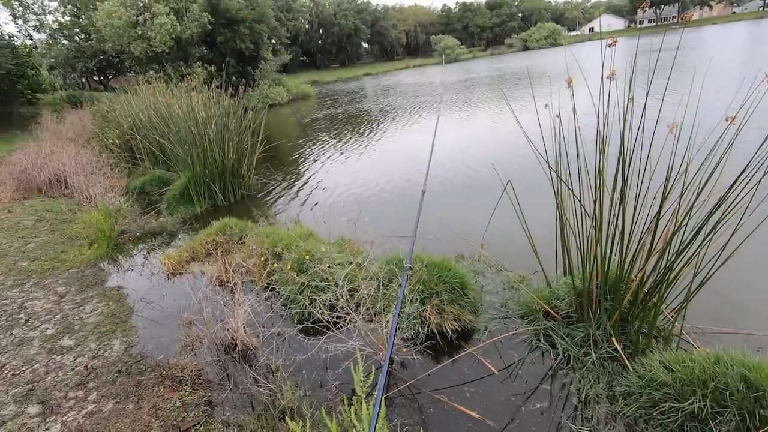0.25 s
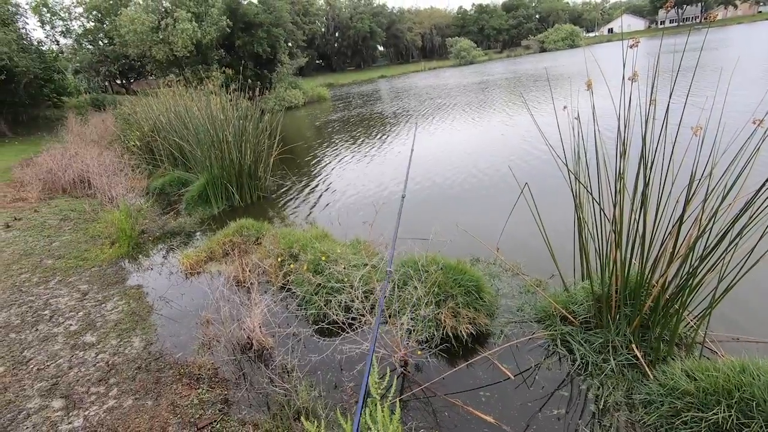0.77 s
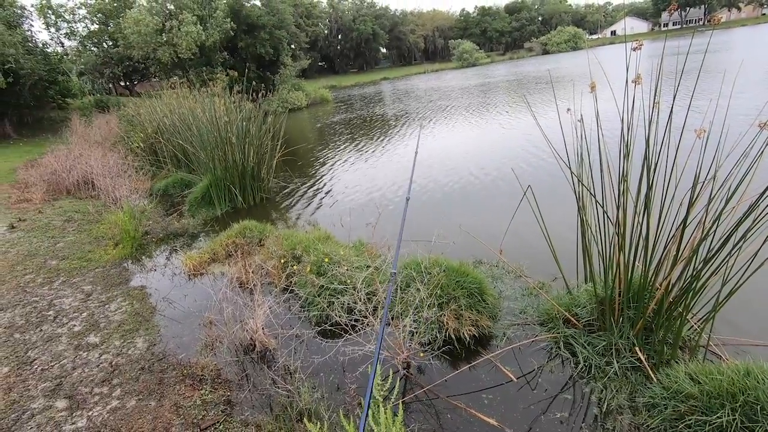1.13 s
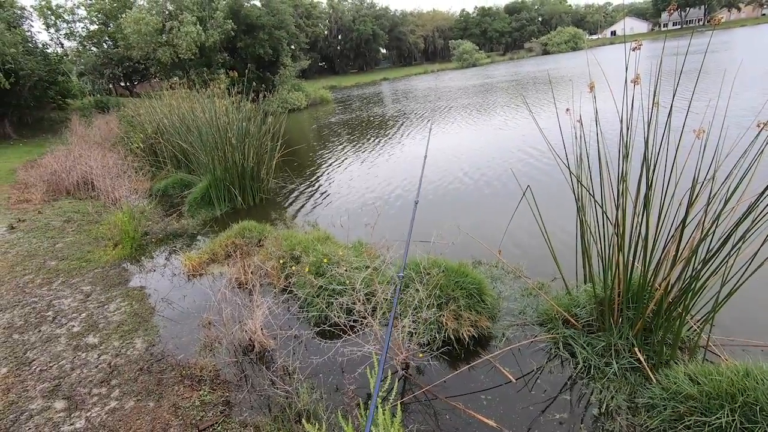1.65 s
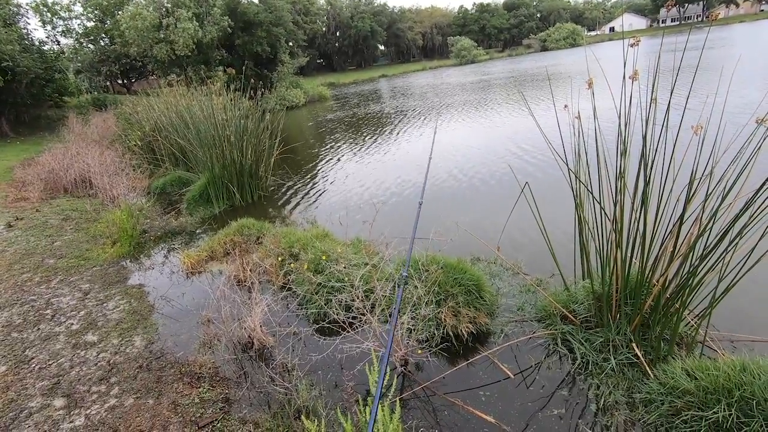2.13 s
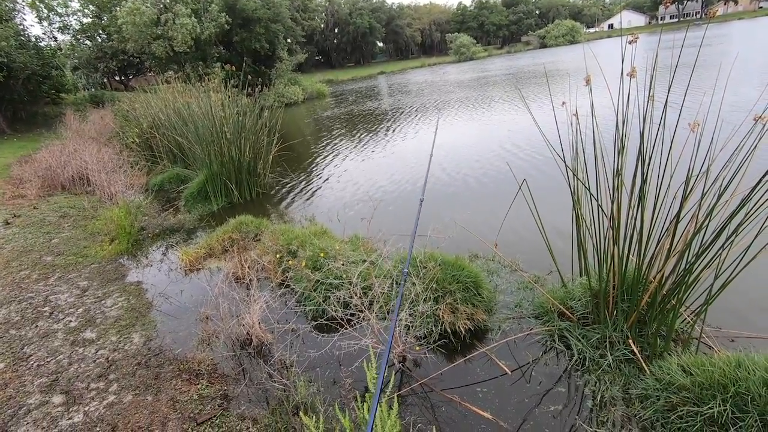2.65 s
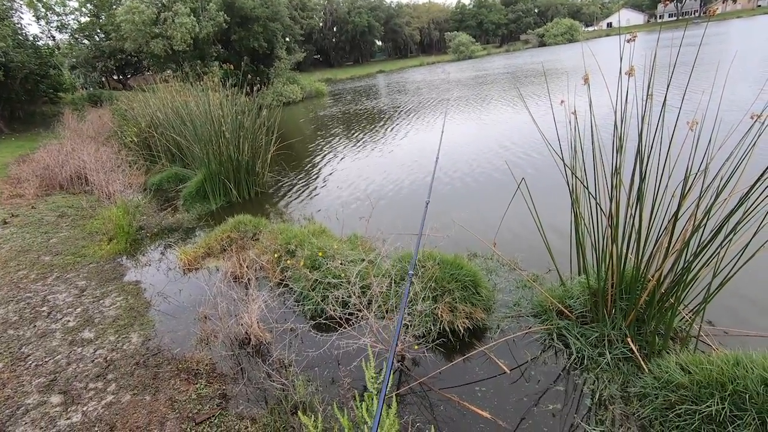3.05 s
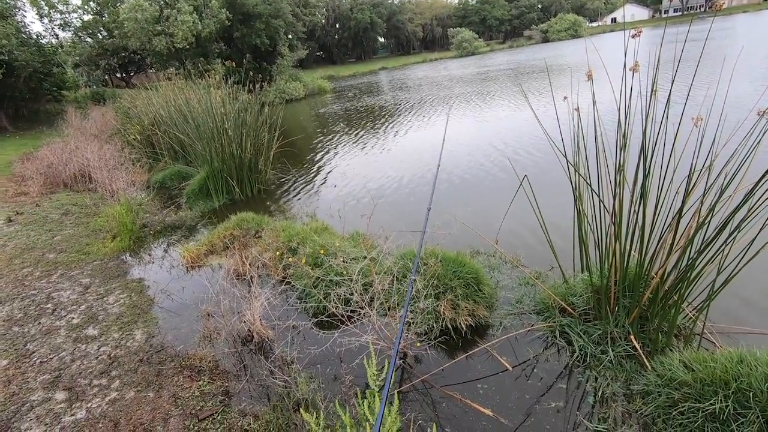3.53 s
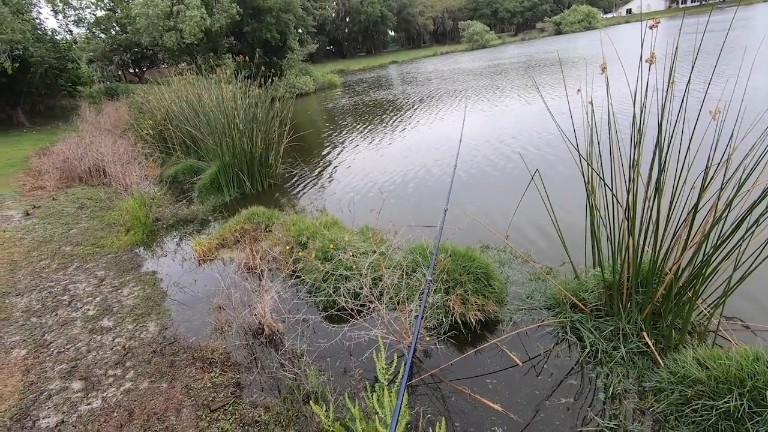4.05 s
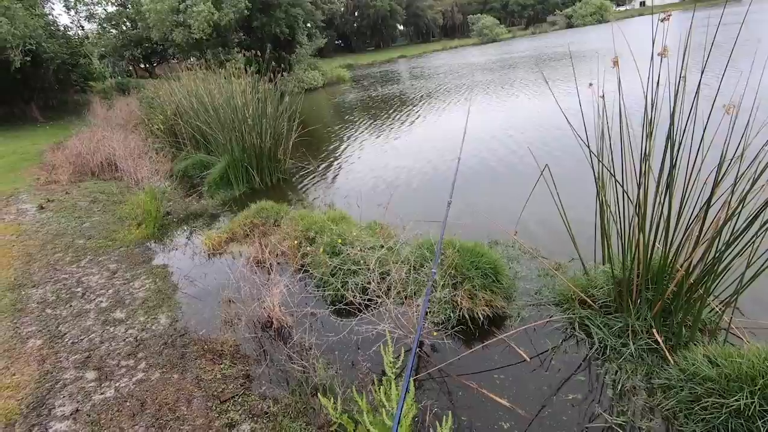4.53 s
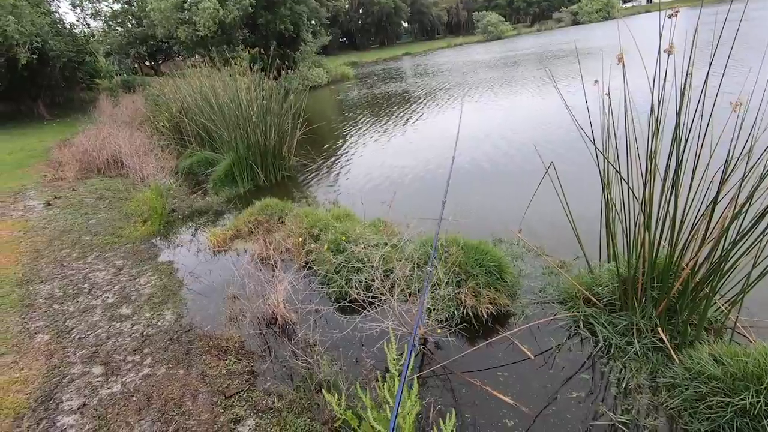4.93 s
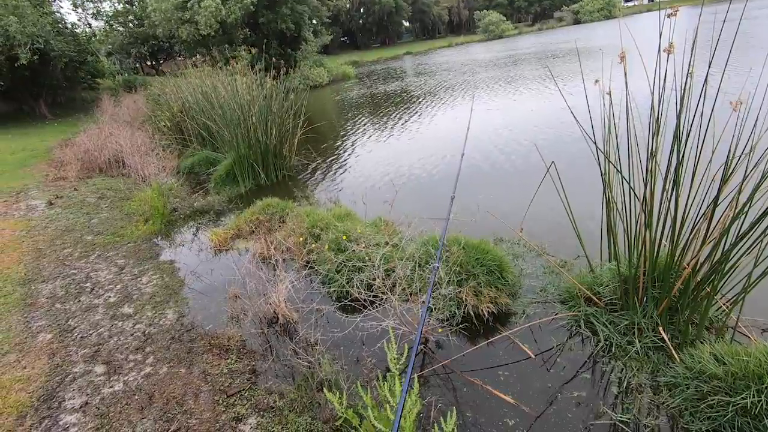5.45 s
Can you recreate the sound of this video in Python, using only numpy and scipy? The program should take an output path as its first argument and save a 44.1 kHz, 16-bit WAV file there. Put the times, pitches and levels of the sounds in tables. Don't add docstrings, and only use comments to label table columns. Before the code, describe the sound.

Outdoors by a pond, a low engine drone with road hiss is strongest at the start and fades after about two seconds. Crickets pulse steadily throughout. A songbird gives short falling whistles and small birds twitter, mostly in the first three seconds. Around three to four and a half seconds, wind thumps low on the stereo microphone, stronger on the left.

```python
import sys
import numpy as np
from scipy import signal
from scipy.fft import rfft, irfft
from scipy.io import wavfile
from scipy.ndimage import uniform_filter1d

SR = 44100
rng = np.random.default_rng(int(sys.argv[2]) if len(sys.argv) > 2 else 0)


def put_to_file(sound):
    columns = np.atleast_2d(sound).T
    safe = np.clip(columns, -1, 1)
    whole_steps = np.round(safe * 32767)
    wavfile.write(sys.argv[1], SR, whole_steps.astype(np.int16))


def to_linear_factor(level_db):
    exponent = np.asarray(level_db, float) / 20
    return 10 ** exponent


N = 250488
TIME = np.arange(N) / SR
HZ = np.fft.rfftfreq(N, 1 / SR) + 1e-3

# t/s, remoteness [0-1]
REMOTENESS = [
    (0, 0.18),
    (.4, 0),
    (1.63, 0.14),
    (2.3, 0.12),
    (3.1, 0.73),
    (4.5, 0.97),
    (5.68, 0.8),
]
# t/s, f/Hz
FIRING_RATE = [(0, 31.04), (2.0, 31.57), (4.0, 31.77), (5.68, 32.21)]
# multiple of the firing rate, level/dB, remoteness [0-1] where shade sets in
HARMONICS = [(2, 1.5, 1.5), (3, -5, 1.5), (4, -5, 1.5), (5, -12.5, 1.5), (6, -4, 0.2), (7, 0.5, 0.13),
             (8, -0.5, 0.65), (9, -11.5, 1.5), (10, -9, 0.18), (11, -11, .12)]
# f/Hz, level/dB per Hz
RUMBLE_SPECTRUM = [(8.2, -59), (14, -13), (54, -3), (70, -0.5), (86, -7), (113, -4.5), (145, -9),
                   (215, -1.5), (259, -4), (332, -11.5), (450, -9), (580, -46), (990, -120)]
HISS_SPECTRUM = [(180, -31), (300, -3), (464, -7.5), (528, -7), (601, -7.5), (907, -6), (1370, -11),
                 (2250, -21.5), (3430, -25), (4340, -30.5), (5000, -37.5), (6500, -64), (11000, -120)]
AIR_SPECTRUM = [(3500, -4), (4600, -4.5), (5600, -1), (6700, -9), (8300, -10.5), (9600, -9.5),
                (10400, -18.5), (11000, -26.5), (11800, -32.5), (12300, -59), (20000, -81.5)]
# f/Hz, left minus right level/dB
PORT_TILT = [(60, 2.5), (89, -2), (130, -1), (200, 0.0), (290, -1), (440, -1.5), (650, -4.5), (970, -11),
             (1440, -9), (2150, -3), (3190, -2), (4750, 1), (7070, 0.5), (10500, 5)]
# f/Hz, likeness [0-1]
PORT_COHERENCE = [(30, 1), (250, 0.93), (500, 0.97), (700, 0.99), (950, 0.23), (1150, 0.67), (2000, 0.44),
                  (4200, 0.72), (4900, 0.33), (6300, 0.18), (8000, 0.31), (9200, .12), (10500, .3)]
# f/Hz, lead of the right port [rad]
PORT_LEAD = [(40, 0.14), (140, -0.6), (400, 0.46), (800, 0.83), (1020, -.5), (1700, -0.6), (2500, 0.87),
             (3500, -0.5), (4500, -0.5), (5400, -1.13), (6200, -3), (7000, -4.5), (7900, -3), (10500, -4.5)]
# t/s, pressure level/dB, sharpness of the eddies [0-1]
GUST_PRESSURE = [(0, -70, 0.6), (2.6, -57, 0.3), (2.71, -42, 0.5), (2.87, -38, 0), (3.03, -35.5, 0.56),
                 (3.13, -40, 0.6), (3.2, -38.5, 0), (3.29, -40.5, 0.76), (3.42, -30, .6), (3.53, -32, .5),
                 (3.6, -38, .4), (3.8, -30, .15), (3.92, -33, .95), (4.08, -33, 1.0), (4.18, -43, .6),
                 (4.38, -37, 0.45), (4.65, -52.5, 0.2), (5.68, -59, .6)]
CHIRP_BEATS = [17, 17, 16, 16, 16, 16, 16, 15, 17, 15, 16, 17, 16, 17, 16, 17, 16, 16, 17, 16, 17, 16, 16,
               18, 16, 16]
# start t/s, length t/s, from f/Hz, to f/Hz, peak level/dB
SLIDE_NOTES = [(.18, .06, 4020, 3040, -61), (.32, .08, 4080, 3100, -64), (.793, .088, 4740, 3330, -64.5),
               (.785, .055, 3950, 3250, -67), (1.35, .1, 3760, 2800, -68), (1.98, .09, 3050, 2800, -63),
               (2.285, .045, 3030, 2880, -65), (2.43, .06, 3470, 3000, -68), (2.625, .072, 2830, 3330, -61)]
HOOK_NOTES = [
    (1.86, .1, 3790, 2920, -60),
    (2.19, .098, 3760, 3020, -59),
]
DROOP_NOTES = [
    (.872, .14, 3350, 2230, -62),
]
FLICK_NOTES = [
    (2.688, .052, 3290, 3440, -58),
    (2.94, .112, 3100, 3520, -59.5),
]
CREEP_NOTES = [
    (2.12, .097, 6500, 6850, -70),
    (3.42, .26, 6350, 6830, -77),
]
NEAR_NOTES = [
    (2.325, .065, 3840, 2880, -52),
]
HIGH_NOTES = [
    (.375, .16, 6880, 7000, -69),
    (.545, .075, 7000, 6920, -75),
    (3.36, .11, 6700, 6860, -79),
    (3.765, .228, 6200, 6920, -62),
    (4.0, .035, 6800, 6780, -75),
]
# bend of glide, scoop f/Hz, place of peak [0-1], start level/dB and end level/dB
# relative to the peak, left minus right level/dB
SLIDE_MANNER = (-.3, 0, .5, -2.5, -2, -.6)
HOOK_MANNER = (1.2, 200, .7, -8, -4, -.6)
DROOP_MANNER = (.8, 0, .75, -2.5, -2, 0)
FLICK_MANNER = (2.4, 0, .3, -2, -6, -1.5)
CREEP_MANNER = (-1.2, 0, .75, -3, -4, -.5)
NEAR_MANNER = (.9, 400, .55, -7, -5, -16)
HIGH_MANNER = (-8, 0, .2, -1.5, -7, -3)
# t/s, peak level/dB, top
# f/Hz
TWITTER_ARCHES = [(.186, -65, 7800), (.212, -60, 6850), (2.6004, -60, 7030), (2.6574, -56, 7360),
                  (2.6724, -66, 7460), (2.6968, -58, 7240), (2.711, -50, 7100), (2.7364, -58, 7410),
                  (2.7706, -54.5, 7300), (2.8095, -61, 7100), (2.8224, -55, 7000), (5.0413, -63, 7610),
                  (5.1008, -66, 7420)]
# t/s, number of notes, spacing t/s, peak level/dB, top f/Hz
TWITTER_TRILLS = [(.3965, 4, .034, -66, 7440), (.41, 4, .038, -68, 6800), (1.1912, 3, .042, -69, 6990),
                  (1.4974, 6, .021, -68, 7280), (2.2154, 4, .031, -66, 7150), (2.2273, 4, .032, -62, 6840),
                  (2.345, 2, .04, -63, 6700), (3.0535, 4, .034, -66, 7090), (3.076, 5, .037, -68, 7480),
                  (3.6354, 7, .0202, -66, 7230), (4.2223, 4, .0203, -66, 7790), (4.2414, 2, .02, -62, 7780),
                  (4.225, 3, .025, -71, 6850)]
# t/s, peak level/dB, left minus right level/dB, top f/Hz
SNAPS = [
    (0.7223, -59, 12, 13500),
    (3.8053, -55.5, 2, 12500),
    (4.0971, -66, 5.5, 10500),
]


def rms_one(x):
    return x / np.sqrt(np.mean(x ** 2) + 1e-20)


def in_time(rows, t=TIME):
    s, *columns = np.transpose(rows)
    return [np.interp(t, s, c) for c in columns]


def at_hz(points):
    hz, value = np.transpose(points)
    return np.interp(np.log(HZ), np.log(hz), value)


def drift(rate_hz, size=N):
    r = np.exp(-80 * np.pi * rate_hz / SR)
    noise = rng.standard_normal(size // 40 + 2002)
    slow = rms_one(signal.lfilter([1], [1, -2 * r, r * r], noise)[500:])
    return np.interp(np.arange(size) / 40, np.arange(len(slow)), slow)


def pan(x, left_db):
    return x * np.array([to_linear_factor(left_db / 2), to_linear_factor(-left_db / 2)]).reshape(2, -1)


def slope(hz, order):
    return 1 / (1 + (HZ / hz) ** order)


def lagged(stereo):
    right = irfft(rfft(stereo[1]) * np.exp(1j * at_hz(PORT_LEAD)), N)
    return np.array([stereo[0], right])


def resonant_noise(hz, half_width_hz):
    noise = rfft(rng.standard_normal(N))
    return rms_one(irfft(noise / (1 + ((HZ - hz) / half_width_hz) ** 2), N))


def engine():
    shade_db, shade_width = 14, 0.071
    remoteness, = in_time(REMOTENESS)
    turns = np.cumsum(in_time(FIRING_RATE)[0]) / SR
    out = 0
    for k, near_db, shaded_at in HARMONICS:
        shade = (1 + np.tanh((remoteness - shaded_at) / shade_width)) / 2
        level_db = near_db - shade_db * shade + 1.97 * drift(1.3)
        phase = 2 * np.pi * k * turns + 0.3 * drift(1.0) + rng.uniform(0, 2 * np.pi)
        out = out + to_linear_factor(level_db) * np.sin(phase + [[0], [.25]])
    return to_linear_factor(-40 - 3.0) * out


def wind():
    windward_db = 5.2
    thud_db, sharp = in_time(GUST_PRESSURE)
    flutter_db = thud_db + 1.5 - 10 * (1 - sharp)
    rush_db = thud_db - 7.5 - 24 * (1 - sharp)
    # level/dB, lower f/Hz, upper f/Hz, share of the windward difference
    bands = ((thud_db, 17, 48, 1.05), (flutter_db, 50, 105, .6), (rush_db, 100, 190, .5))
    out = 0
    for level_db, low_hz, high_hz, lean in bands:
        shape = np.sqrt(slope(high_hz, order=7) * (1 - slope(low_hz, order=5)))
        eddies = rms_one(irfft(rfft(rng.standard_normal((2, N))) * shape, N))
        lumps = to_linear_factor([1.5 * drift(12), 2.2 * drift(6.1)])
        out = out + pan(to_linear_factor(level_db + 1.2), lean * windward_db) * eddies * lumps
    return out


def strokes(times, hz, fall_hz, rise_s, drop_s, level_db, uneven_db, loose):
    out, t = np.zeros(N + 2000), np.arange(-400, 400) / SR
    shape = np.exp(-.5 * (t / np.where(t < 0, rise_s, drop_s)) ** 2)
    for s, (loud, tune, phase) in zip(times, rng.standard_normal((len(times), 3))):
        cycles = (hz + 12 * tune) * t - fall_hz * t ** 2 / 2
        tone = np.sin(2 * np.pi * cycles + loose * phase)
        i = round(s * SR) + 600
        if 0 <= i < N + 1000:
            out[i:i + 800] += to_linear_factor(level_db + uneven_db * loud) * shape * tone
    return out[1000:N + 1000]


def crickets():
    strokes_per_s, first_stroke_s, rest_beats = 72, -.024, 6
    groups = []
    for end, cycle in zip(np.cumsum(CHIRP_BEATS), CHIRP_BEATS):
        groups.append(end - cycle + np.arange(cycle - rest_beats))
    times = first_stroke_s + np.concatenate(groups) / strokes_per_s
    near = strokes(times, 5420, 19000, .0030, .0026, -59.8, 1.1, 1.3) * to_linear_factor(.6 * drift(1.5))
    second_mode = strokes(times + .003, 5050, 9000, .003, .003, -70.5, 2.5, 2.5)
    far = strokes(np.arange(0, 5.68, 1 / 40.5), 5900, 15000, .004, .003, -69.5, 2.5, 3.)
    return lagged(pan(near + second_mode, 1.8) + pan(far, -.6))


def sung(note, manner):
    s, length_s, from_hz, to_hz, peak_db = note
    bend, scoop_hz, peak_at, start_db, end_db, _ = manner
    u = np.linspace(0, 1, 32)
    glide = np.expm1(bend * u) / np.expm1(bend)
    hz = from_hz * (to_hz / from_hz) ** glide - scoop_hz * np.exp(-u * length_s / .006)
    level_db = peak_db + np.interp(u, [0, peak_at, 1], [start_db, 0, end_db])
    return np.transpose([s + length_s * u, hz, level_db])


def whistle(rows, second_db, third_db, shake_db):
    t = TIME[round(rows[0][0] * SR):round(rows[-1][0] * SR)]
    hz, level_db = uniform_filter1d(in_time(rows, t), size=300, mode="nearest")
    phase = 2 * np.pi * np.cumsum(hz + 30 * drift(60, size=len(t))) / SR
    tone = np.sin(phase) + to_linear_factor(second_db) * np.sin(2 * phase)
    tone = tone + to_linear_factor(third_db) * (np.sin(3 * phase) + .12 * np.sin(4 * phase))
    ends = np.clip(np.minimum(t - t[0], t[-1] - t) / 0.007, 0, 1)
    return np.sqrt(2) * to_linear_factor(level_db + shake_db * drift(43, size=len(t))) * ends * tone


def songbird():
    kinds = ((SLIDE_NOTES, SLIDE_MANNER), (HOOK_NOTES, HOOK_MANNER), (DROOP_NOTES, DROOP_MANNER),
             (FLICK_NOTES, FLICK_MANNER), (CREEP_NOTES, CREEP_MANNER), (NEAR_NOTES, NEAR_MANNER),
             (HIGH_NOTES, HIGH_MANNER))
    out = np.zeros((2, N))
    for notes, manner in kinds:
        left_db = manner[-1]
        colour_db = (-20, -29, 2.0) if left_db < -8 else (-60, -70, 1.7)
        for note in notes:
            rows = sung(note, manner)
            tone = whistle(rows, *colour_db)
            i = round(rows[0][0] * SR)
            out[:, i:i + len(tone)] += pan(tone, left_db)
    return out


def trilled():
    rows = []
    for s, count, gap_s, db, hz in TWITTER_TRILLS:
        rows += [(s + k * gap_s, db, hz) for k in range(count)]
    rows = np.array(rows)
    return list(rows + rng.standard_normal(rows.shape) * [.002, 1.5, 90])


def twitter():
    out, t = np.zeros((2, N)), np.linspace(-1, 1, 700)
    for s, peak_db, top_hz in list(TWITTER_ARCHES) + trilled():
        hz = top_hz + 80 - np.where(t < .1, 480, 1500) * np.abs(t - .1) ** 2.5
        tone = np.sin(2 * np.pi * np.cumsum(hz) / SR)
        arch = to_linear_factor(peak_db - 3.0) * np.clip(1 - t ** 2, 0, 1) * tone
        i = round(s * SR)
        out[:, i:i + len(t)] += pan(arch, -.8)
    return out


def echoes(x, t60, level_db):
    tail = np.arange(16000) / SR
    shared, own = rng.standard_normal((2, len(tail))) * to_linear_factor(-60 * tail / t60) * (tail > .006)
    returns = (shared + .5 * own * [[1], [-1]]) / np.linalg.norm(shared)
    return to_linear_factor(level_db) * signal.oaconvolve(x.mean(axis=0)[None], returns, axes=1)[:, :N]


def birds():
    songs, high = songbird(), twitter()
    return songs + high + echoes(songs, .7, -8.5) + echoes(high, .4, -10)


def ticks():
    out, t = np.zeros((2, N)), np.arange(400) / SR
    for s, peak_db, left_db, top_hz in SNAPS:
        band = signal.butter(4, [5000, top_hz], "band", fs=SR, output="sos")
        burst = rng.standard_normal(len(t)) * np.exp(-t / .0015)
        snap = signal.sosfilt(band, burst) * to_linear_factor(peak_db - 6)
        i = round(s * SR)
        out[:, i:i + len(t)] += pan(snap, left_db)
    return out


def tyre_whine():
    swell_db = np.interp(TIME, [0, .12, .22, .45, .68, .85, 1.1], [-65, -70, -52, -53, -55, -72, -74])
    return lagged(pan(to_linear_factor(swell_db) * resonant_noise(1135, 22), -8.5))


def chatter():
    swell_db = np.interp(TIME, [0, .12, .3, .5, .75, 1.0], [-76, -66.5, -60, -66.5, -80, -80])
    return lagged(pan(to_linear_factor(swell_db + 1.8 * drift(25)) * resonant_noise(3400, 750), -6.))


def diffuse(spectrum, share):
    first, second = rfft(rng.standard_normal((2, N)))
    alike = np.clip(at_hz(PORT_COHERENCE), 0, 1)
    right = alike * first * np.exp(1j * at_hz(PORT_LEAD)) + np.sqrt(1 - alike ** 2) * second
    tilt = to_linear_factor(at_hz(PORT_TILT) / 2)
    balance = [tilt, 1 / tilt] / (tilt + 1 / tilt)
    both = irfft(np.array([first, right]) * balance * to_linear_factor(at_hz(spectrum)) * np.sqrt(share), N)
    return both / np.std(both.mean(axis=0))


def far_noise():
    away, = in_time(REMOTENESS)
    boom_db = -36 - 8.5 * away
    road_db = -47 - 1.9 * away
    rustle_db = -59.5 - 1.5 * away
    low, mid = slope(153.0, order=8), slope(346, order=10)
    high, top = slope(1804, order=8), slope(4350, order=8)
    out = to_linear_factor(-40.5) * diffuse(RUMBLE_SPECTRUM, low)
    out += to_linear_factor(boom_db - 5.5 + 0.95 * drift(7.2)) * diffuse(RUMBLE_SPECTRUM, mid * (1 - low))
    out += to_linear_factor(road_db + .5 * drift(0.93)) * diffuse(HISS_SPECTRUM, high * (1 - mid))
    out += to_linear_factor(rustle_db + 0.65 * drift(9.3)) * diffuse(HISS_SPECTRUM, top * (1 - high))
    air_db = -69 + 0.67 * drift(4.5) + .6 * drift(1.5)
    return out + to_linear_factor(air_db) * diffuse(AIR_SPECTRUM, 1 - top)


def scene():
    return (engine() + wind() + crickets() + birds() + ticks() + tyre_whine() + chatter()
            + far_noise())


def band_limit(x):
    return signal.sosfilt(signal.butter(12, 14500, fs=SR, output="sos"), x)


def record(dry):
    edge = np.minimum(TIME, TIME[-1] - TIME)
    mix = dry * np.clip(edge / .002 + .3, 0, 1)
    return band_limit(mix)


dry = scene()
out = record(dry)
put_to_file(out)
```